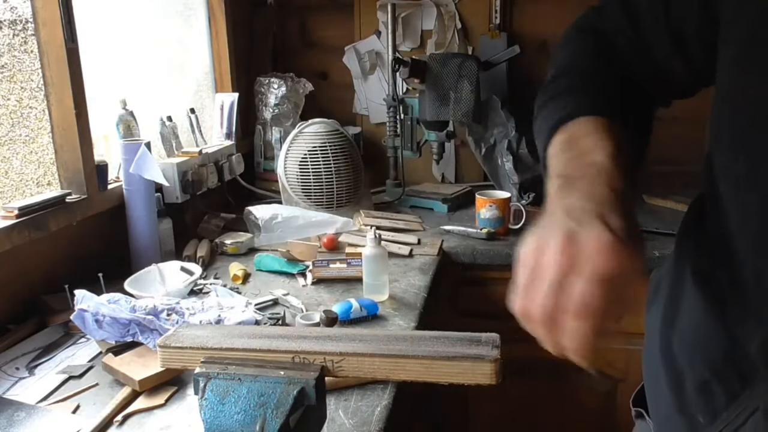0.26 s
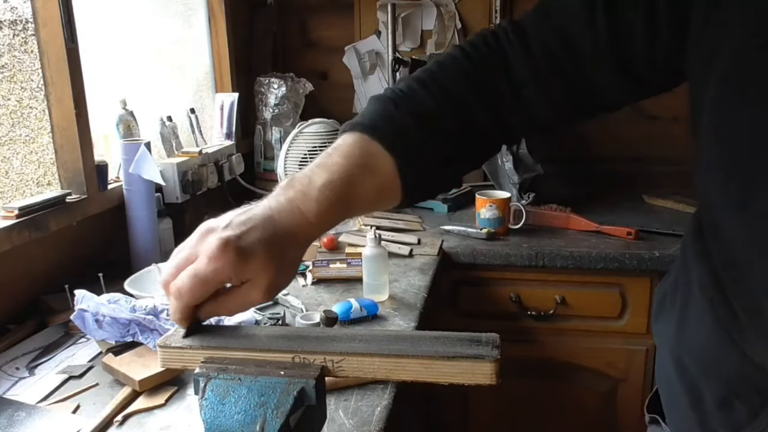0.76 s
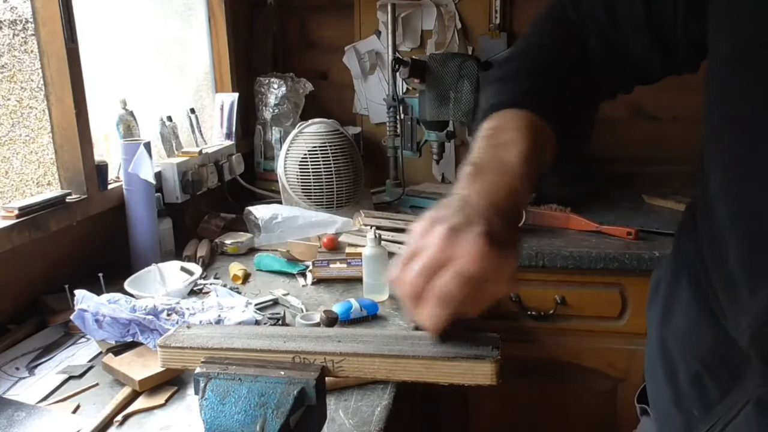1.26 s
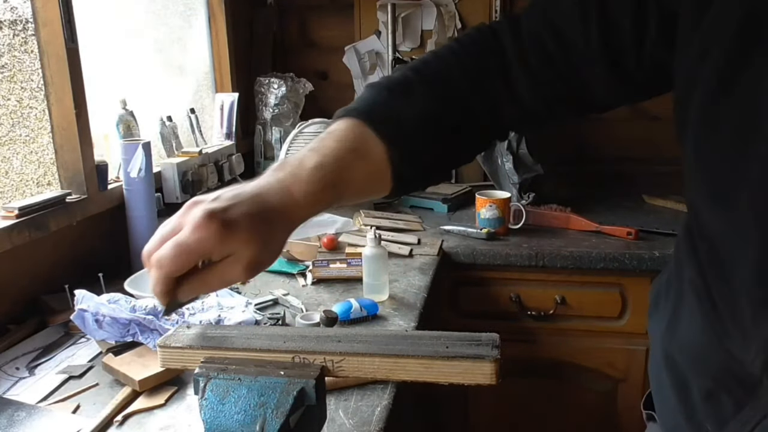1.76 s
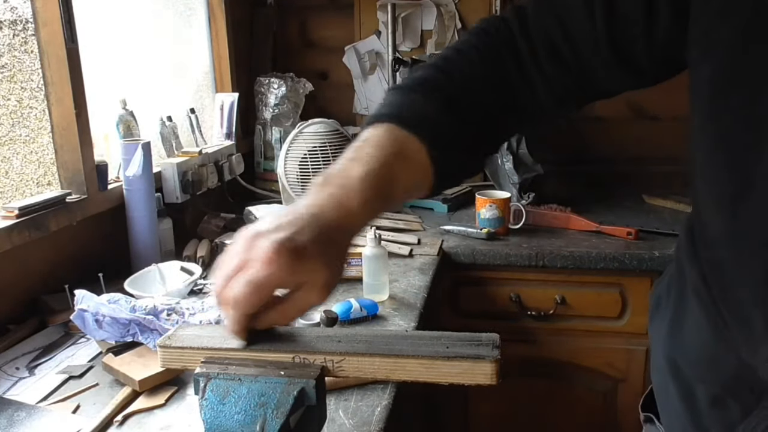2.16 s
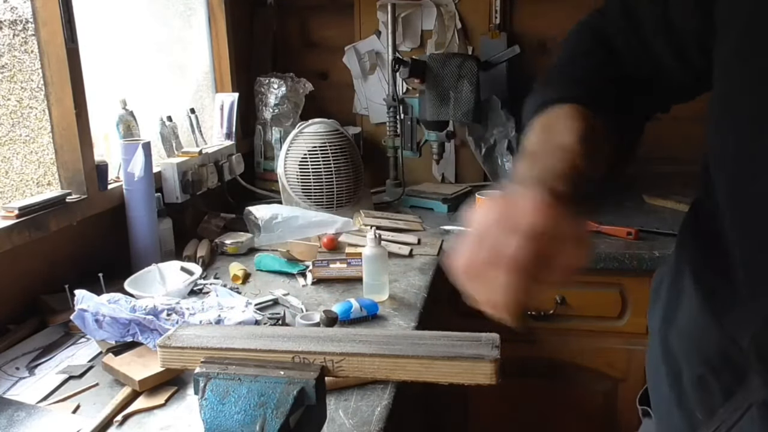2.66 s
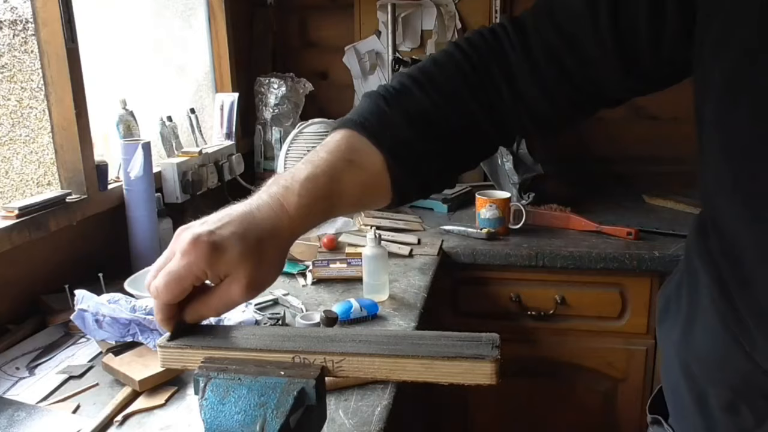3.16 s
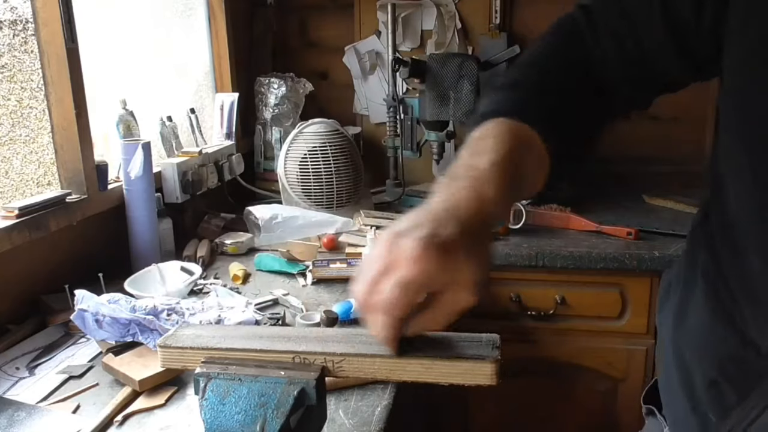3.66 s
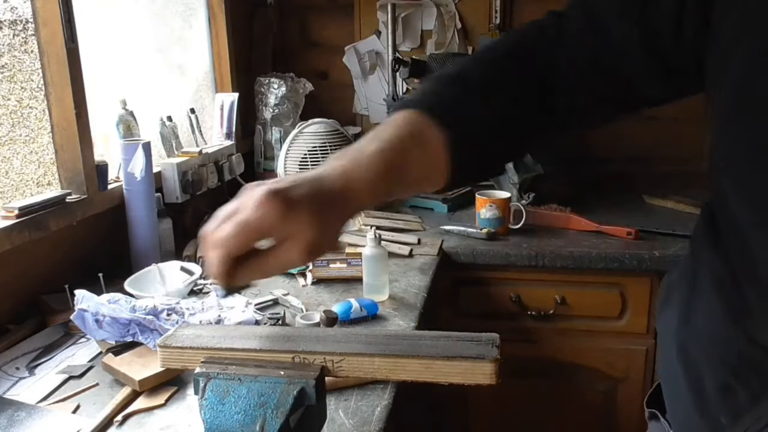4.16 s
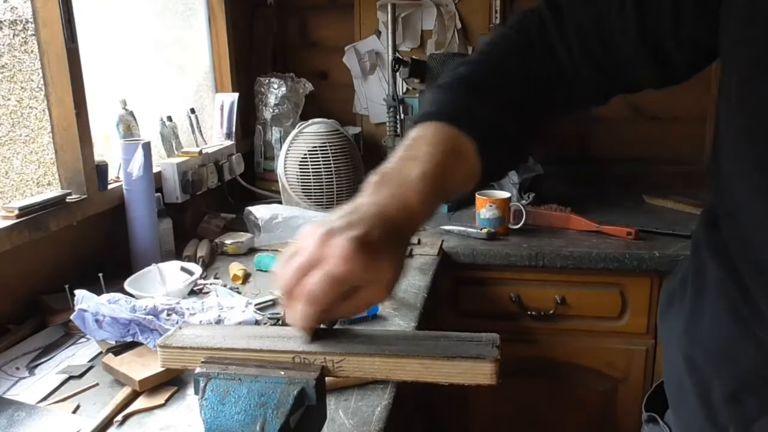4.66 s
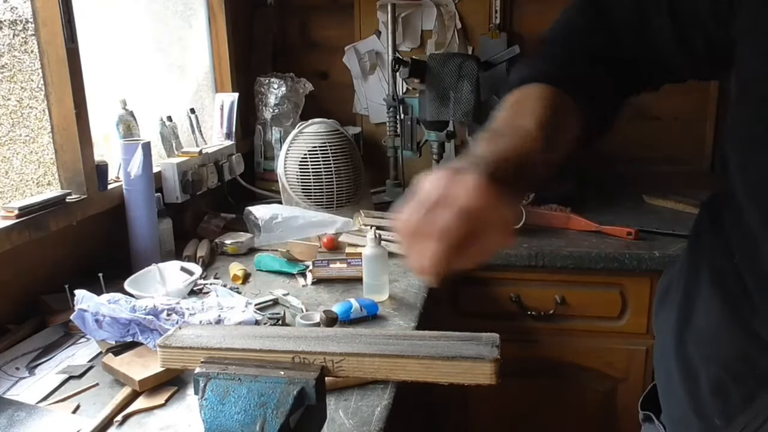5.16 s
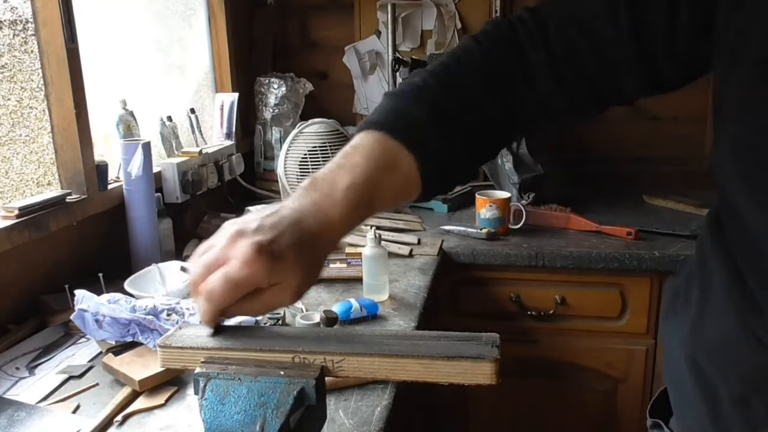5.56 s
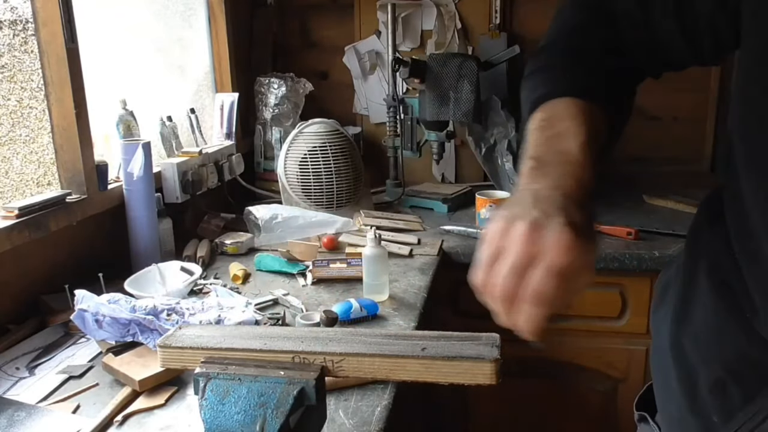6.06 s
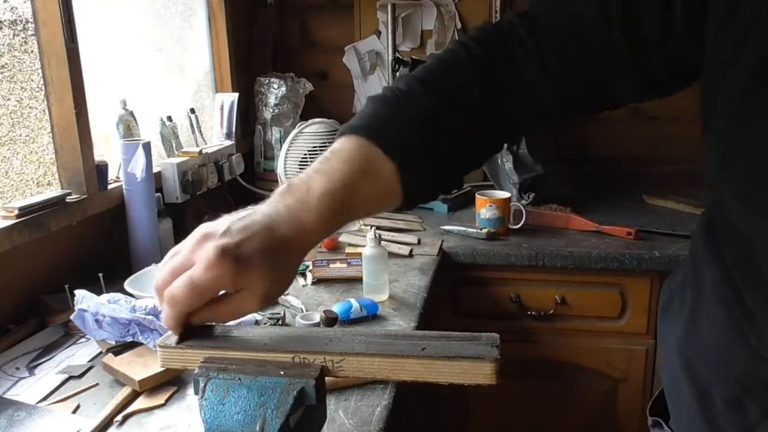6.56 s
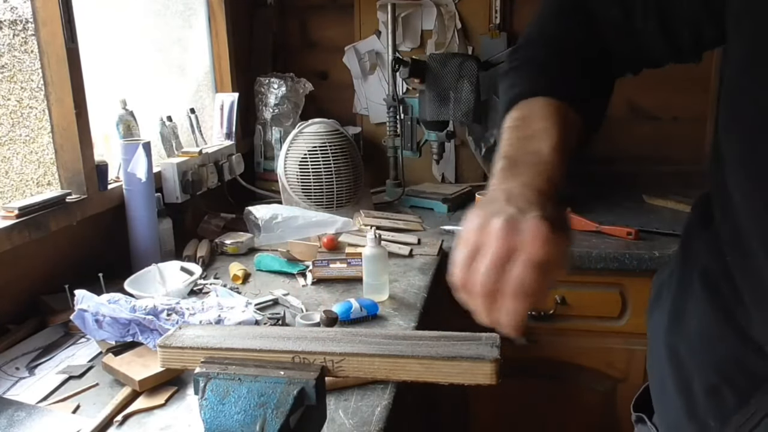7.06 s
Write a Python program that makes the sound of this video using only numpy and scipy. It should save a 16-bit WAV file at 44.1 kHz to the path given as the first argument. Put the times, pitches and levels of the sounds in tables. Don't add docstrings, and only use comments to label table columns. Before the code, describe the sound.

Slow repeated scraping of a steel edge over leather on wood, with light taps before strokes and a snap and woody thud after them.

```python
import sys
import numpy as np
from scipy import signal
from scipy.fft import rfft, irfft, next_fast_len
from scipy.io import wavfile
from scipy.ndimage import uniform_filter1d, map_coordinates

SR = 44100
rng = np.random.default_rng(int(sys.argv[2]) if len(sys.argv) > 2 else 0)


def wrap_up_sound(samples):
    columns = np.atleast_2d(samples).T
    tamed = np.clip(columns, -1, 1)
    steps = np.round(tamed * 32767).astype(np.int16)
    wavfile.write(sys.argv[1], SR, steps)


def volts_from_decibels(level):
    exponent = np.asarray(level, float) / 20
    return 10 ** exponent


N = 321921
TIME = np.arange(N) / SR
KNOCK_TIME = np.arange(SR // 4) / SR

# (frequency [Hz], level [dB], t60 [s], sign at the listener [+-1])
BENCH = [(100.2, -33.5, 0.6, -1), (140.3, -18.7, 0.179, 1), (164.1, -22.4, 0.393, -1),
         (172.7, -21.1, 0.271, -1), (209.8, -14.0, 0.185, -1), (232.2, -12.1, 0.2, 1),
         (246.4, -7.2, 0.174, 1), (268.2, -8.2, 0.292, -1), (293.6, -9.4, 0.319, 1),
         (325.7, -14.4, 0.19, -1), (416.6, -29.1, 0.234, -1), (476.2, -24.6, 0.224, 1)]
# (time [s], thump [dB], board [dB], snap [dB], last scuff over the corner [dB])
SLIPS = [
    (0.4127, -18, -32, -30, -38),
    (1.601, -18.5, -30, -27, -46),
    (2.7865, -18, -33, -29, -39),
    (4.0463, -13.5, -25, -24, -42),
    (5.2279, -17, -30, -26, -50),
    (6.3253, -21, -38, -29, -44),
]


def unit(x):
    return x / np.sqrt(np.mean(x ** 2) + 1e-20)


def along(points, hz):
    f, v = np.transpose(points)
    return np.interp(np.log(hz + 1), np.log(f + 1), v)


def wobble(rate):
    return map_coordinates(rng.standard_normal(int(N * rate / SR) + 4), [TIME * rate])


def unit_gain(h):
    return h / np.sqrt(np.mean(abs(h) ** 2))


def filtered(x, response):
    m = next_fast_len(N + SR // 4)
    h = unit_gain(response(np.fft.rfftfreq(m, 1 / SR)))
    return irfft(rfft(x, m) * h, m)[..., :N]


def resonances(modes):
    f = np.geomspace(10, SR / 2, 6000)
    h = 0
    for k, (center, width, db) in enumerate(modes):
        h = h + (-1) ** k * volts_from_decibels(db) * 1j * f * width / (center ** 2 - f * f + 1j * f * width)
    return lambda hz: np.interp(hz, f, h)


def pair(alike):
    turn = np.arccos(np.clip(alike, 0, 1)) / 2
    a, b = rng.standard_normal((2, N))
    return np.array([np.cos(turn) * a + np.sin(turn) * b, np.cos(turn) * a - np.sin(turn) * b])


def room_tone():
    # (frequency [Hz], density [dB per Hz])
    rumble_spectrum = [(15, -36), (25, -1), (62, -10), (85, -4.5), (195, -3.5), (252, 0.5), (554, -9),
                       (678, -8), (757, -7), (1240, -9.5), (2000, -24), (2600, -57), (4400, -120)]
    # (frequency [Hz], likeness [0-1])
    rumble_alike = [(60, .85), (300, 0.55), (700, 0.27), (5000, 0.065)]
    # (frequency [Hz], density [dB per Hz])
    hiss_spectrum = [(1100, -33), (1900, -9), (2300, -5), (4500, -7.5), (5300, -7), (6100, -12), (7000, -8),
                     (8700, -7), (9900, -1), (11500, -5.5), (13000, -8), (15400, -10)]
    swell_db, swell_s = 5, .32

    def mid_and_side(f):
        turn = np.arccos(np.clip(along(rumble_alike, f), 0, 1)) / 2
        return volts_from_decibels(along(rumble_spectrum, f)) * np.array([np.cos(turn), np.sin(turn)])

    mid, side = filtered(pair(0), mid_and_side)
    rumble_db = np.full(N, -59.5)
    for s, *_ in SLIPS:
        rumble_db += swell_db * np.clip(1 - abs(TIME - s) / swell_s, 0, 1) * (TIME > s)
    rumble = volts_from_decibels(rumble_db) * unit(np.array([mid + side, mid - side]))
    hiss = volts_from_decibels(-65.5) * filtered(pair(0.062), lambda f: volts_from_decibels(along(hiss_spectrum, f)))
    return rumble + hiss


def controls():
    # (time [s], grain hiss [dB])
    strokes = [
        [(0.0, -44.5), (.044, -43), (.155, -44.5), (.175, -41), (.284, -44.5), (.374, -36), (.408, -36)],
        [(.955, -73), (.988, -59), (1.052, -50.5), (1.2, -46), (1.3, -48), (1.41, -45), (1.56, -44),
         (1.596, -38)],
        [(2.222, -71), (2.228, -59), (2.248, -48), (2.38, -38), (2.46, -37.5), (2.58, -39.5), (2.68, -40),
         (2.782, -36)],
        [(3.398, -62), (3.418, -52), (3.48, -44.5), (3.66, -38), (3.75, -36.5), (3.84, -39), (3.94, -35),
         (4.041, -32)],
        [(4.654, -63), (4.658, -52), (4.71, -46), (4.8, -42), (4.88, -44.5), (4.93, -43), (5.16, -45),
         (5.223, -42)],
        [(5.766, -70), (5.778, -57), (5.85, -45), (5.9, -45), (5.95, -48.5), (6.08, -46), (6.24, -47.5),
         (6.321, -42)],
        [(6.825, -69), (6.845, -52), (6.93, -43), (7.0, -41), (7.1, -43.5), (7.22, -40.5), (7.3, -43)],
    ]
    # (time the board sings [s], half length [s], song over the hiss [dB],
    # stick-slip of the slow start [dB])
    songs = [(.255, .085, 6, 0), (1.45, .09, 6.5, 10), (2.66, .08, 2.5, 4), (3.89, .09, .5, 16),
             (5.08, .07, 4, 2), (6.17, .08, 7.5, 3), (7.19, .06, 5, 2)]
    # (sizzle over hiss at far end [dB],
    # at near end [dB], bench against board at far end [dB], at near end [dB], board [dB])
    holds = [(-.5, 4, -7, -15, 2.5), (6.5, 5, -5, -11, 1.5), (1, 3, -4, -13, -1), (-1.5, 4, -3, -6, .5),
             (3.5, 5.5, -11, -8, 0), (4, 6.5, -12, -8, -.5), (.5, 5, -9, -17, -1)]
    # (far end [dB], middle [dB], near end [dB])
    muted_db = (-13.5, -7, -9)
    hiss_over_db = 1.0
    board_at_db, board_grows = -39, .55
    corner_s, corner_sizzle_db, corner_song_db = .025, 4, -1
    speed_up_s = .3
    level = np.zeros((5, N))
    place, slow = np.zeros((2, N))
    for rows, (sings_s, half_s, song_db, stutter_db), hold_db in zip(strokes, songs, holds):
        s, pressure_db = np.transpose(rows)
        on = (TIME >= s[0]) & (TIME <= s[-1] + .003)
        t = TIME[on]
        place[on] = np.clip(2 - (s[-1] - t - .1) / 0.19, 0, 2)
        slow[on] = np.exp(-(t - s[0]) / speed_up_s) * stutter_db

        def by_place(db):
            return np.interp(place[on], np.linspace(0, 2, len(db)), db)

        corner = np.clip(1 - (s[-1] - t) / corner_s, 0, 1)
        hiss_db = np.interp(t, s, pressure_db) + hiss_over_db
        sizzle_db = hiss_db + by_place(hold_db[:2]) + corner * corner_sizzle_db
        board_db = np.minimum(board_at_db + board_grows * (hiss_db + 42), hiss_db + 11) + hold_db[-1]
        bench_db = board_db + by_place(hold_db[2:-1])
        song = volts_from_decibels(by_place(muted_db)) + corner * volts_from_decibels(corner_song_db)
        song += volts_from_decibels(song_db) * np.exp(-abs((t - sings_s) / half_s) ** 2.8)
        level[:, on] = volts_from_decibels([hiss_db, sizzle_db, board_db, hiss_db, bench_db])
        level[3, on] *= song
    return level, place, slow


def rubbed(gain, response, alike, wet, t60):
    keep = volts_from_decibels(-120 / (t60 * SR))
    power = signal.lfilter([1 - keep], [1, -keep], gain ** 2, zi=[gain[0] ** 2])[0]
    direct = np.sqrt(1 - wet) * gain * pair(alike)
    walls = np.sqrt(wet) * np.sqrt(power) * pair(alike * .45)
    return filtered(direct + walls, response)


def fiber_grit(slow):
    grit = unit(volts_from_decibels(2.44 * wobble(900) + 1.2 * wobble(60)))
    stutter_hz = 105 * volts_from_decibels(4.5 * wobble(70))
    stutter = volts_from_decibels(slow * np.cos(np.pi * np.cumsum(stutter_hz) / SR) ** 12)
    return grit * stutter / np.sqrt(abs(uniform_filter1d(stutter ** 2, size=2000)))


def grain_hiss(gain):
    # (frequency [Hz], density [dB per Hz])
    grain = [(1100, -35), (1800, -9), (2500, -8.5), (3300, -3.5), (4000, -.5), (4900, -3.5), (5600, -9),
             (6200, -15), (7000, -20), (9000, -46), (15000, -120)]
    return rubbed(gain, lambda f: volts_from_decibels(along(grain, f)), alike=1.0, wet=0.67, t60=0.18)


def edge_sizzle(gain, place):
    # (frequency [Hz], density [dB per Hz])
    edge_far = [(3410, -35), (5800, -6.5), (6290, -11), (7530, -4), (9510, 1.5), (14500, -14), (15400, -16)]
    # (frequency [Hz], density [dB per Hz])
    edge_near = [(3410, -33), (5800, -6), (6450, -7), (7230, -2.5), (9540, 0.5), (10700, -2.5),
                 (14000, -5.5), (15400, -14)]
    out = 0
    for spectrum, share in ((edge_far, 1 - place / 2), (edge_near, place / 2)):
        out = out + rubbed(gain * np.sqrt(share), lambda f: volts_from_decibels(along(spectrum, f)), alike=0.27, wet=0.46, t60=0.15)
    return out


def patchy(x, depth_db):
    z = signal.stft(x, nperseg=512)[2]
    field = uniform_filter1d(rng.standard_normal(z.shape[1:]), size=2, axis=0)
    field = uniform_filter1d(field, size=30, axis=1)
    return signal.istft(z * volts_from_decibels(depth_db * unit(field)), nperseg=512)[1][:, :N]


def board_modes(gain, place):
    # (frequency [Hz], width [Hz], blade at far end [dB], in the middle [dB], at near end [dB])
    board = [(330, 74, -12.5, -4.5, 0), (389, 32, -4, 2.5, 0), (485.4, 35, 2.5, 7.5, 3.5),
             (517.7, 23, 2.5, -2.5, 5.5), (570, 30.5, 3.5, 6, 1), (655, 32, 0, -2, -0.5),
             (703, 30.4, -9, 2, 9), (779, 32, 5, 4.5, -4), (823, 45, 0.5, -11, -4.5),
             (890, 45, 1.5, -6.5, -2.5), (991.3, 44, 6.5, 4, 4), (1065, 33, 5, -1, 1.5),
             (1163, 36, 1.5, -10.5, 0), (1257, 31, -7, -2, 1), (1334, 62, -5.5, -2.5, 0.5)]
    out = 0
    for spot in range(3):
        modes = [(hz, width, db[spot]) for hz, width, *db in board]
        share = np.clip(1 - abs(place - spot), 0, 1)
        out = out + rubbed(gain * np.sqrt(share), resonances(modes), alike=0.95, wet=0.28, t60=0.29)
    return out


def board_song(gain, place):
    # (frequency [Hz], width [Hz], level [dB])
    singing_modes = [(1405, 34, -8), (1499.6, 23.3, 7), (1562, 46, -9), (1673, 23, -2.5)]
    noisy = rubbed(gain * volts_from_decibels(-3.5), resonances(singing_modes), alike=1.0, wet=0.29, t60=0.23)
    locked_hz = 1485 + 9 * place + 14 * wobble(60)
    locked = np.sin(2 * np.pi * np.cumsum(locked_hz) / SR)
    return noisy + uniform_filter1d(gain, size=400) * volts_from_decibels(-4.5 + 1.8 * wobble(40)) * locked


def bench_rumble(gain):
    lows = [(hz, 4 / t60, db + 6 * (hz < 200) + 8 * (hz < 120)) for hz, db, t60, _ in BENCH]
    return rubbed(gain, resonances(lows + [(85, 20, -21)]), alike=1.0, wet=0.098, t60=0.31)


def scrape():
    level, place, slow = controls()
    level *= volts_from_decibels(0.85 * wobble(25) + 0.57 * wobble(140))
    hiss, sizzle, board, singing, bench = level
    grit = fiber_grit(slow)
    rub = patchy(grain_hiss(hiss * grit) + edge_sizzle(sizzle * grit, place), depth_db=2.0)
    return rub + board_modes(board, place) + board_song(singing, place) + bench_rumble(bench)


def ring(modes, vary_db):
    out = np.zeros(len(KNOCK_TIME))
    for hz, db, t60, *sign in modes:
        decay = volts_from_decibels(db + rng.normal(0, vary_db) - 60 * KNOCK_TIME / t60)
        out += np.prod(sign) * decay * np.sin(2 * np.pi * hz * KNOCK_TIME)
    return out


def burst(t60):
    return rng.standard_normal((2, len(KNOCK_TIME))) * volts_from_decibels(-60 * KNOCK_TIME / t60)


def tick():
    return burst(0.0054)[0] + volts_from_decibels(-17) * burst(0.21)


def shake(t60):
    return burst(t60)[0] + 0.48 * burst(t60)


def place_at(track, s, sound):
    start = round(s * SR)
    track[:, start:start + len(KNOCK_TIME)] += sound


def knocked(wood, ticks, rattle):
    # (frequency [Hz], level [dB])
    tick_spectrum = [(500, -30), (1500, -5), (4000, 0), (6200, -12), (9500, 3.5), (14000, -14),
                     (16000, -30)]
    loose = resonances([(50, 30, 0), (91, 35, -1), (195, 130, -3), (390, 110, 0.5), (516, 113, 1.5),
                        (800, 580, -4.5), (1310, 360, -7.5)])
    bright = filtered(ticks[:, :N], lambda f: volts_from_decibels(along(tick_spectrum, f)))
    return wood[:, :N] + bright + filtered(rattle[:, :N], loose)


def slips():
    # (frequency [Hz], level [dB], t60 [s])
    near_end = [(534, -10, 0.16), (845, -11, 0.23), (989.5, -11, .15), (1330, -8, .1), (1420, -3, .06),
                (1495, 4, .14), (1641, -19.5, .12)]
    wood, ticks, rattle = np.zeros((3, 2, N + SR))
    for s, thump_db, board_db, snap_db, scuff_db in SLIPS:
        place_at(wood, s, volts_from_decibels(thump_db) * ring(BENCH, vary_db=0.76) * volts_from_decibels(-15 * KNOCK_TIME))
        place_at(rattle, s, volts_from_decibels(thump_db - 17) * shake(.33))
        early = s - .003
        place_at(wood, early, volts_from_decibels(board_db - 9.5) * ring(near_end, vary_db=4.5))
        place_at(ticks, early, volts_from_decibels(snap_db - 3) * tick() + volts_from_decibels(scuff_db) * shake(.19))
    return knocked(wood, ticks, rattle)


def taps_and_catches():
    # (time [s], board [dB], thump [dB], tick [dB], rattle [dB])
    taps = [
        (0.888, -34, -42.5, -66, -58),
        (1.7813, -47, -57, -55, -46),
        (2.1228, -43.5, -38, -53, -52),
        (2.19, -64, -54, -62, -66),
        (3.2853, -55, -39, -66, -51.5),
        (4.5926, -37, -37, -40, -44.5),
        (5.547, -60, -56, -70, -61),
        (5.713, -42, -47, -56, -61),
        (6.599, -62, -69, -72, -74),
        (6.796, -38.5, -41, -55, -58),
    ]
    # (time [s], board [dB], tick [dB])
    catches = [(0.955, -58, -54), (0.983, -54, -48), (0.999, -41, -37), (1.005, -46, -39),
               (1.011, -52, -46), (2.236, -50, -52), (2.245, -39, -35), (2.265, -52, -36),
               (3.402, -52, -41), (3.4165, -42, -34), (3.437, -38, -34), (4.656, -46, -50),
               (5.776, -44, -45), (5.819, -50, -35)]
    # (frequency [Hz], level [dB], t60 [s], sign at the listener [+-1])
    far_end = [(734, -22.7, 0.13, 1), (766, -35.2, 0.126, 1), (819, -14.5, 0.099, -1),
               (893, -4.0, 0.041, -1), (969, 3.0, 0.016, 1), (988, 1.1, 0.067, -1), (1058, -5.7, 0.125, -1),
               (1067, 1.1, 0.015, 1), (1156, -14.1, 0.13, -1), (1244, -4.9, 0.036, 1),
               (1239, -10.1, 0.077, -1), (1303, -20.2, 0.13, 1)]
    # (frequency [Hz], level [dB], t60 [s], sign at the listener [+-1])
    vice = [(102, -10.8, 0.25, 1), (131, -0.0, 0.034, -1), (158, 0.6, 0.048, 1), (208, -7.8, 0.039, -1),
            (250, -7.6, 0.114, 1), (279, -14.8, 0.25, -1), (348, -34.1, 0.25, -1), (383, -24.1, 0.25, 1),
            (560, -28.6, 0.248, 1)]
    contacts = list(taps)
    for s, board_db, tick_db in catches:
        contacts.append((s, board_db, board_db - 3, tick_db, board_db - 17))
    wood, ticks, rattle = np.zeros((3, 2, N + SR))
    for s, board_db, thump_db, tick_db, rattle_db in contacts:
        place_at(wood, s, volts_from_decibels(board_db) * ring(far_end, vary_db=0.0))
        place_at(wood, s + .008, volts_from_decibels(thump_db) * ring(vice, vary_db=2.0))
        place_at(rattle, s, volts_from_decibels(rattle_db) * shake(0.18))
        place_at(ticks, s, volts_from_decibels(tick_db) * tick())
    return knocked(wood, ticks, rattle)


def scene():
    return room_tone() + scrape() + slips() + taps_and_catches()


def top_cut(x):
    return signal.sosfilt(signal.butter(12, 15540, fs=SR, output="sos"), x)


def record(dry):
    # (frequency [Hz], left minus right [dB])
    sides = [(100, 0.5), (300, -2.5), (600, -0.5), (1200, 2), (3000, -0.1), (9000, 1), (13000, -2.5)]
    low_cut_hz, top_hz, gain_db = 45, 15200, -1.68

    def microphones(f):
        cut = (1j * f / (low_cut_hz + 1j * f)) ** 3 * (f < top_hz)
        return cut * volts_from_decibels(along(sides, f) * np.array([[.5], [-.5]]))

    mix = volts_from_decibels(gain_db) * filtered(dry, microphones)
    return top_cut(mix)


dry = scene()
out = record(dry)
wrap_up_sound(out)
```